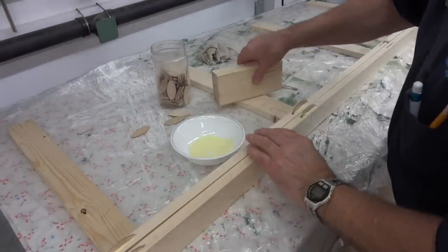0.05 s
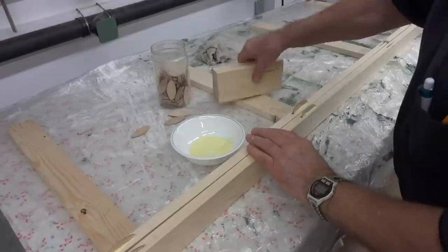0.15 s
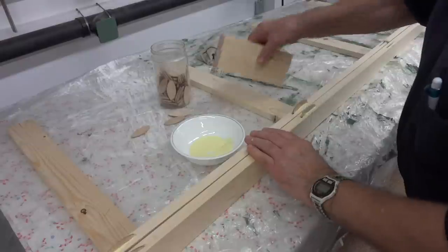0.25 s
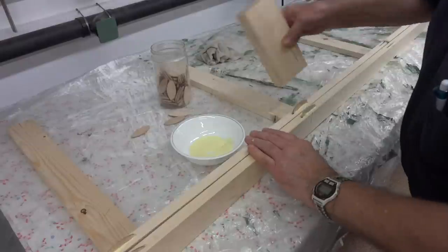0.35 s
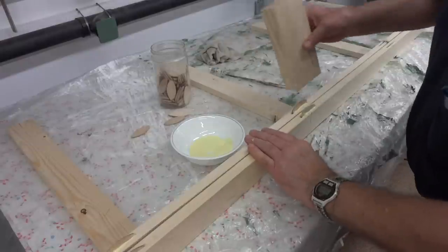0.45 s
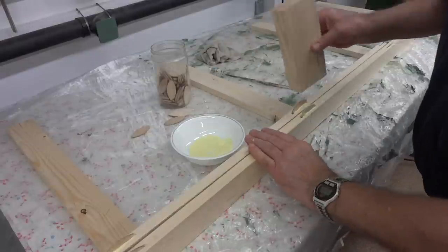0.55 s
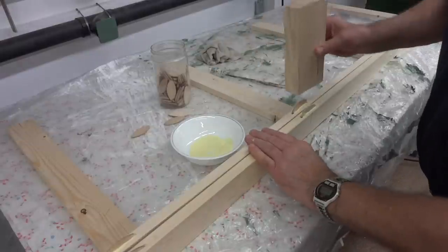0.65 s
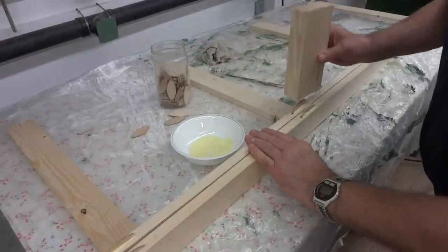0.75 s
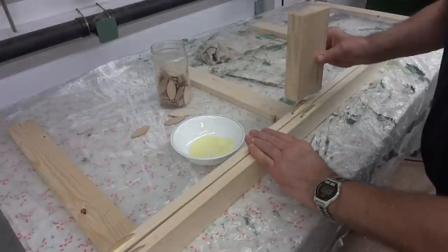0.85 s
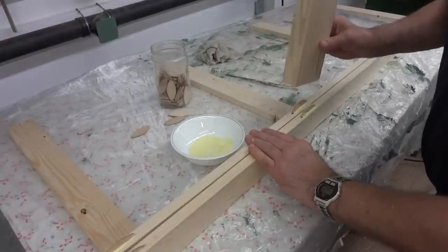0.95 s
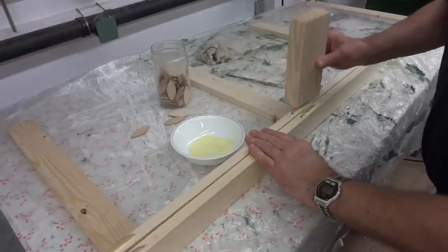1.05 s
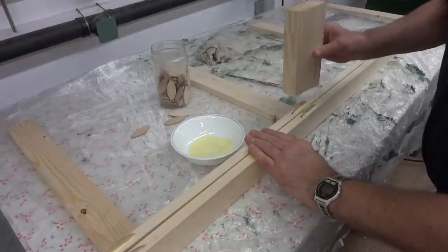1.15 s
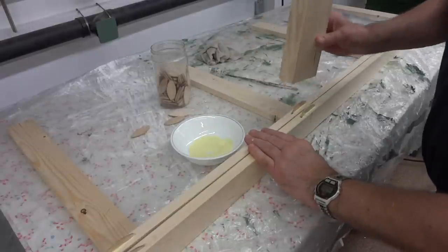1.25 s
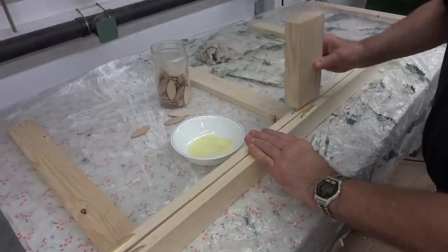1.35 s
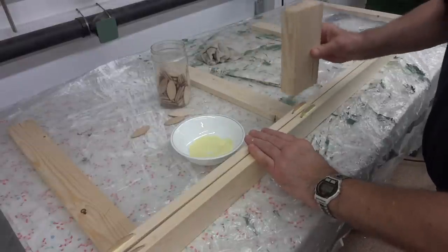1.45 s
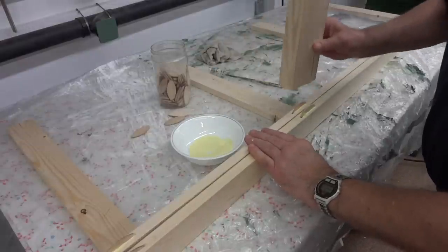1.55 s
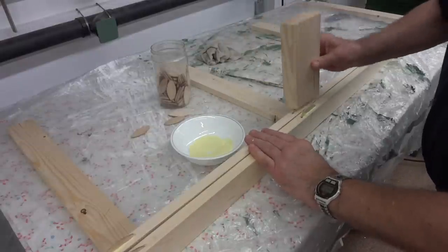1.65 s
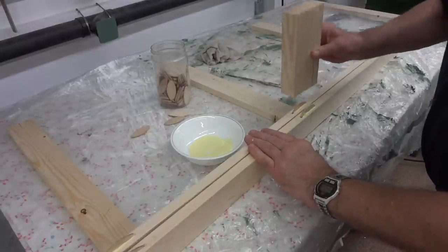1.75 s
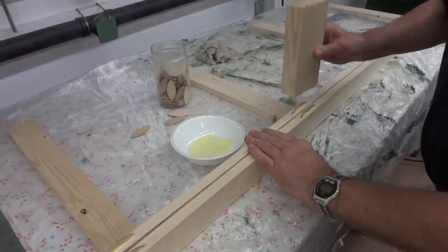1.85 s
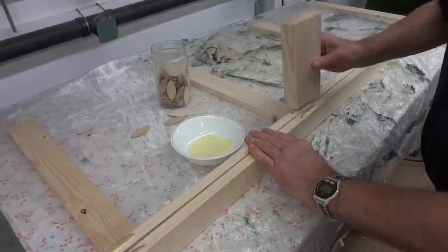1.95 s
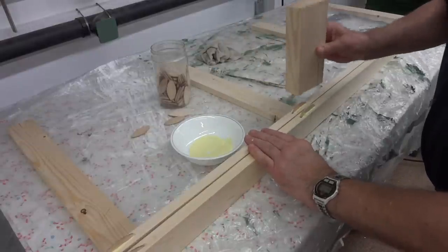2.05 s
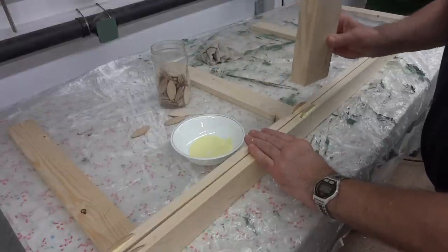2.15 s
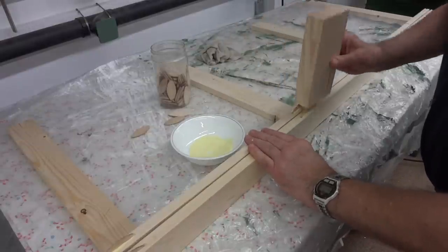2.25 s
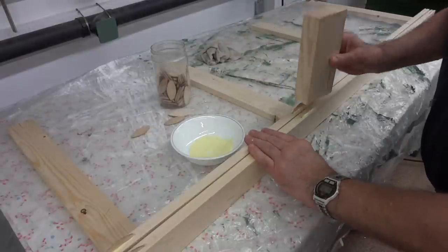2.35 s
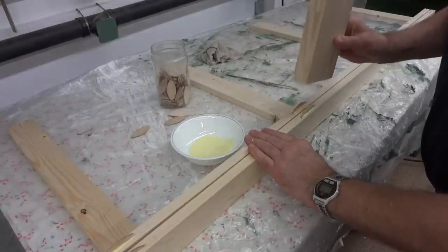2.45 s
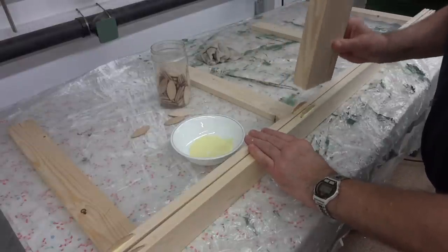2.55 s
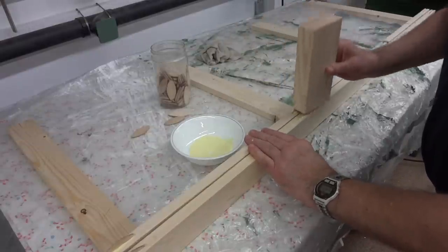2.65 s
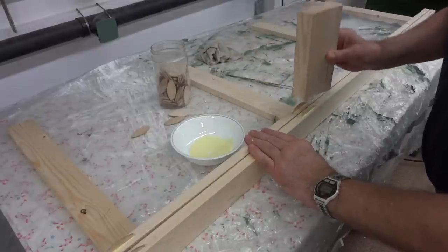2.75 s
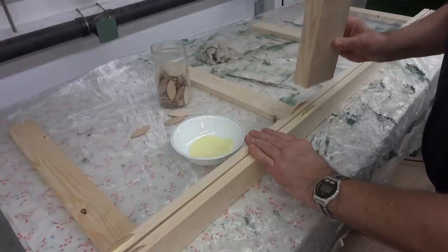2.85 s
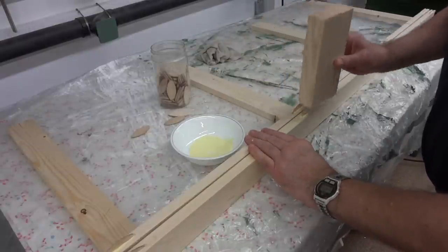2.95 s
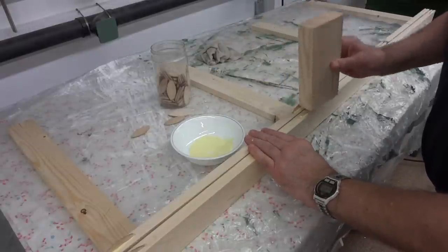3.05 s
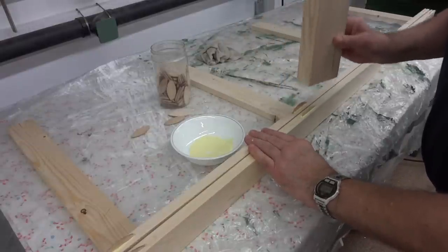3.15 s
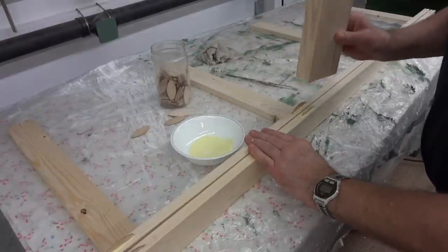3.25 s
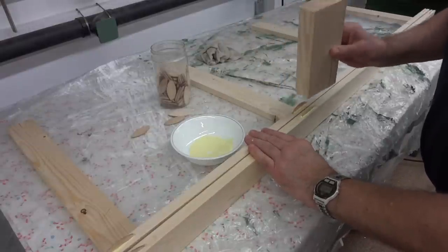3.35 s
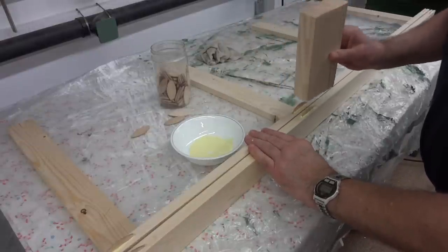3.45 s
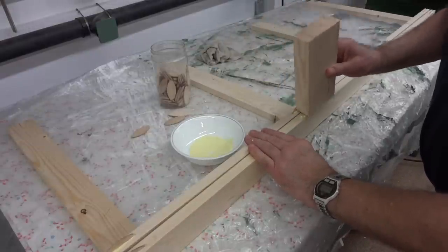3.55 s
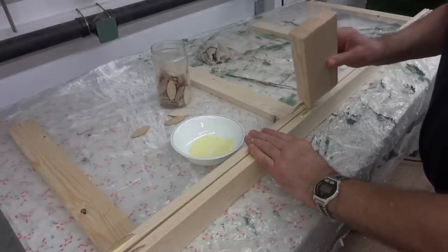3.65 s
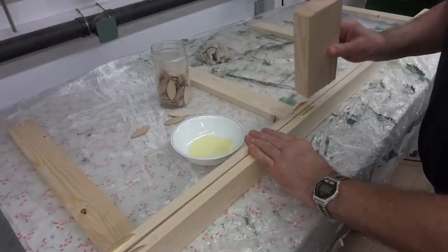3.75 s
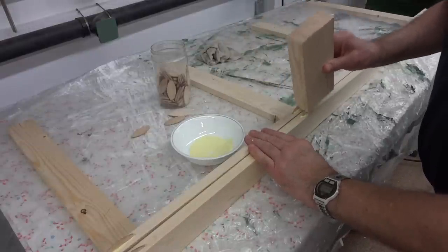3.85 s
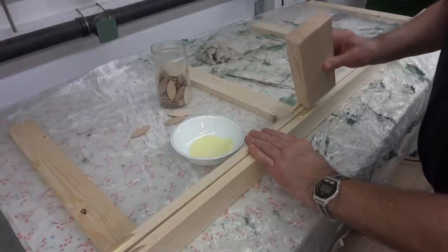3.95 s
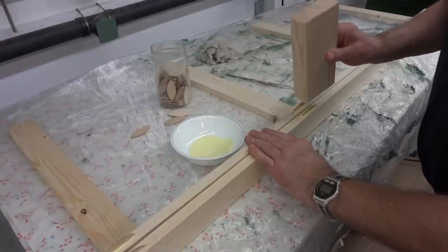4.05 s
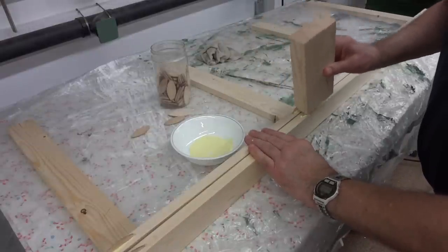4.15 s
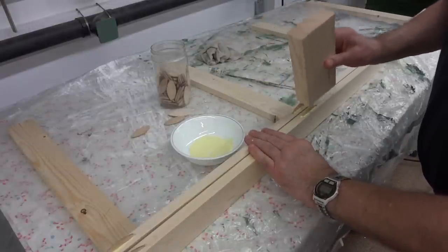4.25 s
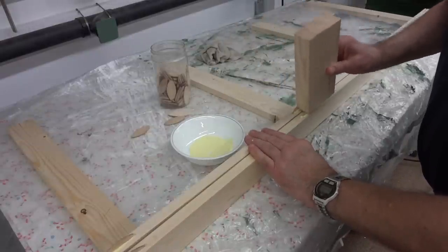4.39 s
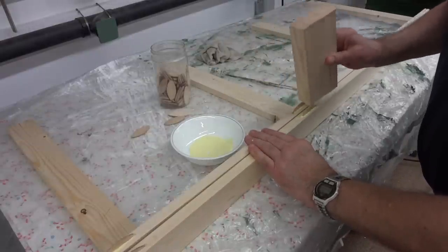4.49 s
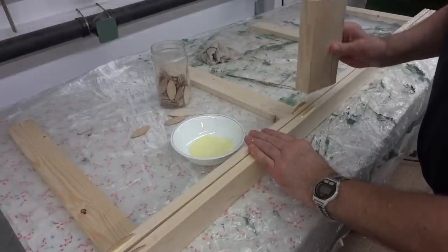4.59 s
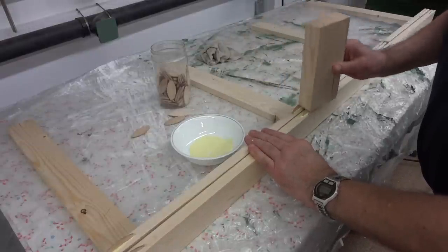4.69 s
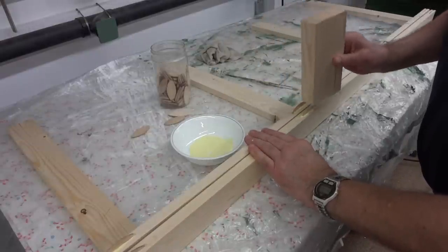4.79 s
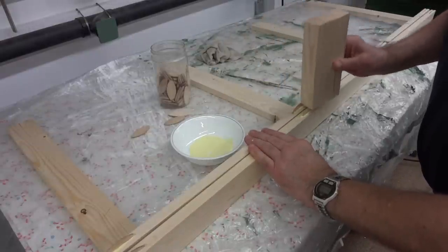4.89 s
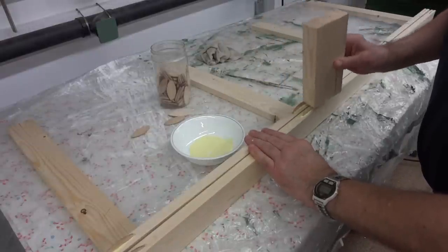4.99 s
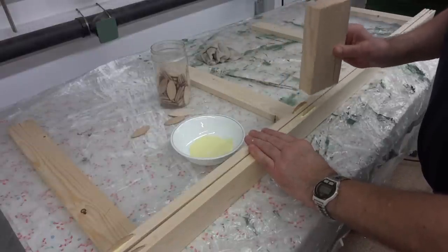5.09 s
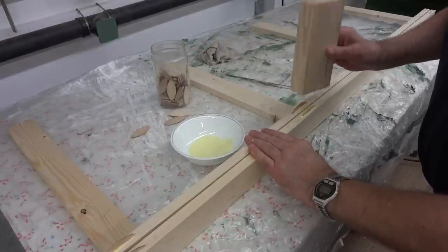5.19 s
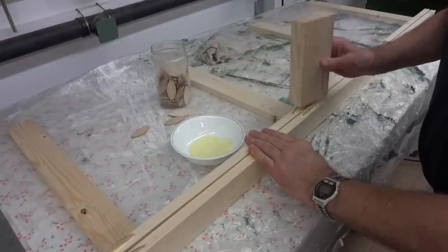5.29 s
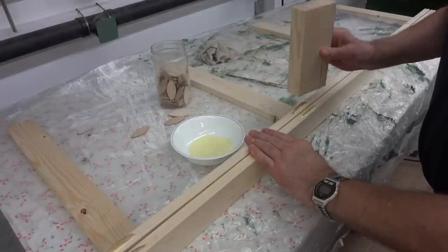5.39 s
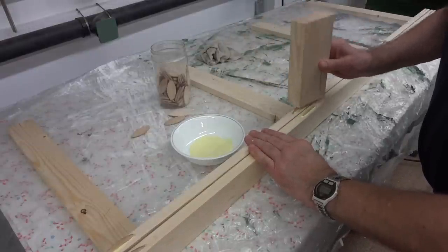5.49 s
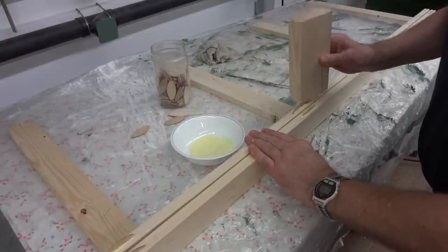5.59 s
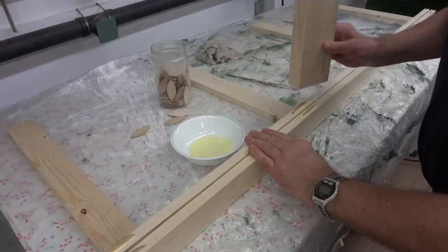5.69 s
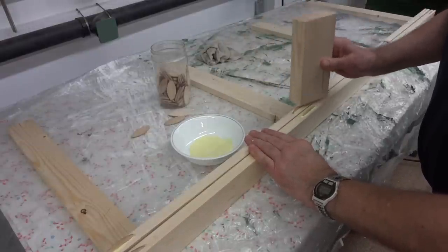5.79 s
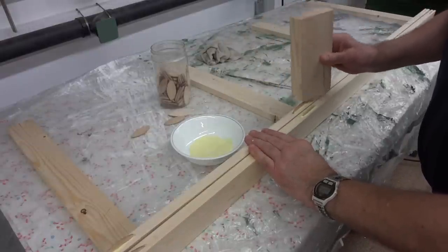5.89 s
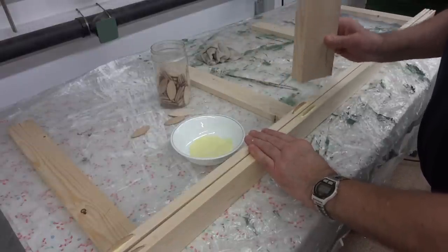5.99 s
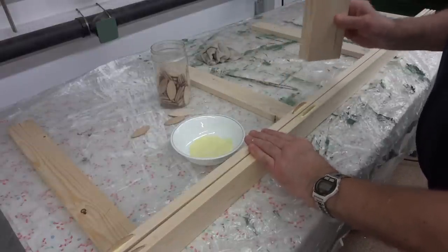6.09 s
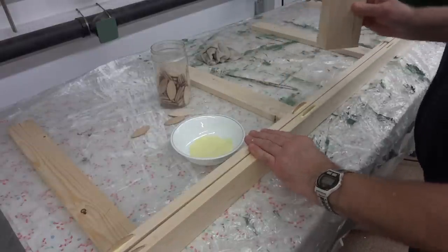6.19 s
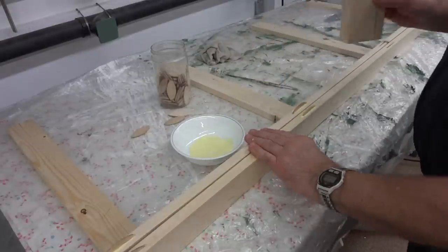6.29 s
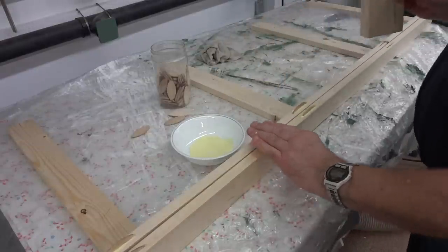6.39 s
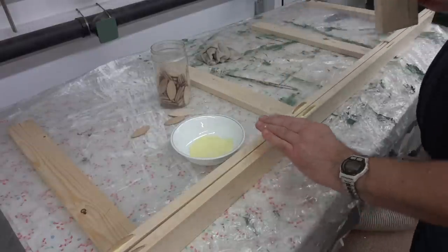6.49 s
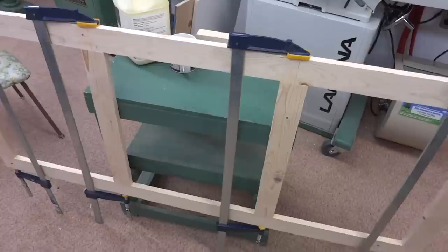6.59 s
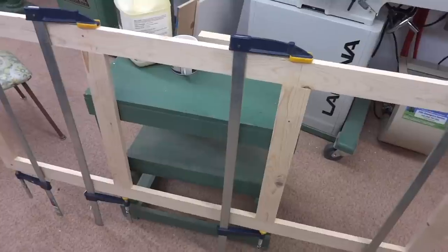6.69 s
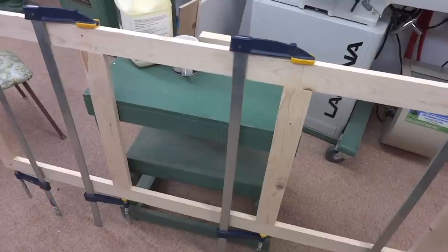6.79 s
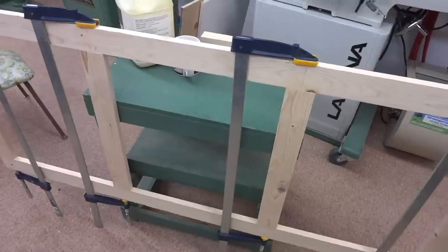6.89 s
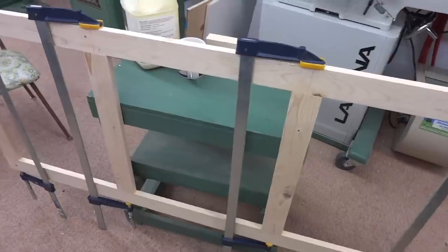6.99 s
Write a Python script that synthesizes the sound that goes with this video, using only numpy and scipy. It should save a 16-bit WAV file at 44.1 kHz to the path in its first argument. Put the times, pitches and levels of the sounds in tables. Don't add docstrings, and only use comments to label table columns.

```python
import sys
import numpy as np
from scipy import signal
from scipy.fft import rfft, irfft, next_fast_len
from scipy.io import wavfile
from scipy.ndimage import uniform_filter1d

SR = 44100
rng = np.random.default_rng(int(sys.argv[2]) if len(sys.argv) > 2 else 0)


def transcribe(signal):
    frames = np.atleast_2d(signal).T
    limited = np.clip(frames, -1, 1)
    pcm = np.round(limited * 32767).astype(np.int16)
    wavfile.write(sys.argv[1], SR, pcm)


def natural_amplitude(level_db):
    exponent = np.asarray(level_db, float) / 20
    return 10 ** exponent


N = 310093
HZ = abs(np.fft.fftfreq(16384, 1 / SR))


def evened(x):
    return x / np.sqrt(np.mean(x ** 2) + 1e-20)


def read(points, hz):
    f, value = np.transpose(points)
    return np.interp(np.log(hz + 1), np.log(f + 1), value)


def coloured(x, points):
    size = next_fast_len(x.shape[-1])
    gain = natural_amplitude(read(points, np.fft.rfftfreq(size, 1 / SR)))
    return irfft(rfft(x, size) * gain, size)[..., :x.shape[-1]]


def add(mix, s, sound):
    part = mix[..., round(s * SR):][..., :sound.shape[-1]]
    part += sound[..., :part.shape[-1]]


def peaks(modes, spread_db, detune=0.):
    hz, db, t60 = np.transpose(modes)[:, :, None]
    luck = rng.standard_normal((2, len(modes), 1))
    off = (HZ - hz * (1 + detune * luck[1])) * t60 / 1.54
    strength = t60 * natural_amplitude(db + spread_db * luck[0]) ** 2
    power = (strength / (1 + off ** 2) ** 1.77).sum(0)
    return power / power.mean()


def broad(points):
    power = natural_amplitude(read(points, HZ)) ** 2
    return power / power.mean()


def causal(power):
    log_size = .5 * np.log(power + 1e-14)
    return np.fft.ifft(np.exp(np.conj(signal.hilbert(log_size)))).real[:len(HZ) // 2]


# pitch in Hz, level in dB.
HUM_COLOUR = [(25, -6), (90, -6), (235, -12), (295, -1), (740, -3.5), (1500, -10), (4200, -16),
              (11000, -19)]
# pitch in Hz, width in Hz, level in dB.
HUM_PITCHES = [(262, 12, -79), (320, 11, -73), (372, 12, -71.5), (446, 8, -67), (546, 20, -72),
               (727, 30, -72), (2153, 520, -72)]
# pitch in Hz, level in dB.
MAINS_TONES = [(59.2, -72), (118.4, -81.5)]


def hum():
    size = next_fast_len(N)
    a, b = rng.standard_normal((2, size))
    hz = np.fft.rfftfreq(size, 1 / SR)
    shape = sum(natural_amplitude(db) * evened(1 / (1 + (2 * (hz - f) / w) ** 2)) for f, w, db in HUM_PITCHES)
    pitches = irfft(rfft(a) * shape, size)
    slow = uniform_filter1d(uniform_filter1d(rng.standard_normal(size), 4000), 4000)
    swell = natural_amplitude(0.79 * evened(slow))
    wash = coloured(np.array([b, natural_amplitude(-3.0) * b[::-1]]), HUM_COLOUR)
    wash = natural_amplitude(-59.5) * wash / wash[0].std()
    t = np.arange(size) / SR
    mains = sum(natural_amplitude(db) * np.sqrt(2) * np.sin(2 * np.pi * f * t) for f, db in MAINS_TONES)
    tones = np.array([[1], [.03]]) * (swell * pitches + mains)
    return (swell * wash + tones)[:, :N]


# loudest moment in seconds, level in dB,
# rise in seconds, fall in seconds, level of the dull part in dB.
STROKES = [
    (.1, -56, 0.0057, .1, -32),
    (.198, -60, 0.015, 0.017, -26),
    (.238, -54.5, 0.0085, 0.041, -22),
    (.43, -65, 0.037, 0.06, -5),
    (0.484, -42.5, 0.041, 0.021, -40),
    (.58, -50, 0.034, .05, -13),
    (.625, -59.5, 0.057, 0.047, 6),
]


def rustle():
    s, db, rise, fall, dull_db = np.transpose(STROKES)[:, :, None]
    t = np.arange(N) / SR - s
    strokes = natural_amplitude(db - 10.5 * np.maximum(-t / rise, t / fall))
    fibres = rng.standard_normal(N) * (rng.random(N) < .08)
    bright = evened(coloured(fibres, [(1500, -28), (4000, 1), (7000, 4.5), (9000, 9.5), (11500, 2.0)]))
    dull = evened(coloured(fibres, [(500, -6.0), (1200, 3.0), (2200, 1.5), (5000, -9.5), (9000, -27)]))
    return strokes.sum(0) * bright + (strokes * natural_amplitude(dull_db)).sum(0) * dull


# start in seconds, level in dB.
BRUSH_TIMES = [(0.188, -46), (0.2345, -42), (0.4634, -40), (0.499, -59)]
# pitch in Hz, level in dB, time to die by 60 dB in seconds.
BRUSH_TONES = [(2480, 14, 0.048), (3280, -3, 0.029), (4400, 1, 0.022), (5450, -4, 0.015)]


def brushes(out):
    for s, db in BRUSH_TIMES:
        add(out, s, natural_amplitude(db + 21) * causal(peaks(BRUSH_TONES, spread_db=6.0)))


# pitch in Hz, time to die by 60 dB in seconds.
ECHO_LENGTH = [(100, 0.8), (270, 0.4), (700, 0.34), (1800, 0.23), (4800, 0.24), (10000, 0.2)]
# pitch in Hz, left-right difference against the middle in dB.
ECHO_WIDTH = [(60, -36.5), (140, -21), (350, -26), (830, -15), (2000, -13), (4800, -10), (11500, -27.5)]
# delay in seconds, level in dB.
SINGLE_ECHOES = [(0, -20), (.0036, -14), (.0064, -18.5), (.012, -25)]


def room():
    taps = rng.standard_normal((2, SR))
    taps[1] = coloured(taps[1], ECHO_WIDTH)
    hz, t, z = signal.stft(taps, SR, nperseg=256)
    hz = hz[:, None]
    near_wall = 1 + 0.7 * np.exp(-t / 0.005) * np.clip(hz / 6000., 0, 1)
    bloom = 1 - 0.28 * np.exp(-t / .012) / (1 + (hz / 1400.) ** 2)
    far_wall = 1 + 0.22 * np.exp(-((t - 0.053) / 0.014) ** 2)
    fill_s = 0.033
    decay = natural_amplitude(-60 * (np.hypot(t, fill_s) - fill_s) / read(ECHO_LENGTH, hz))
    tail = signal.istft(z * near_wall * far_wall * bloom * decay, SR, nperseg=256)[1][:, :SR]
    tail *= np.clip(np.arange(SR) / SR / .0012, 0, 1)
    tail /= np.linalg.norm(tail[0])
    for s, db in SINGLE_ECHOES:
        tail[0, round(s * SR * rng.uniform(.97, 1.03))] += natural_amplitude(db)
    return tail


# pitch in Hz, level in dB, time to die by 60 dB in seconds.
CLOCK_CASES = [
    [(5150, -2, .008), (5570, 0, .011), (6000, -4, .006), (6400, -2, .007), (7000, -4, .006)],
    [(2970, 0, .015), (3290, -2, .015), (4800, -14, .008)],
]


def clocks(out):
    even = np.arange(.330, N / SR, .4415)
    limping = np.arange(.262, N / SR, .4793)
    limping = limping - .003 * (np.arange(len(limping)) % 2)
    for times, db, case in zip([even, limping], [-24.5, -28.5], CLOCK_CASES):
        for s in times:
            add(out, s, natural_amplitude(db) * causal(peaks(case, spread_db=5.5, detune=0.0092)))


# pitch in Hz, level in dB, time to die by 60 dB in seconds.
TIP_TONES = [(1080, -12, .03), (2350, -9, .025), (3220, -4, .008), (3950, 0, .005), (4760, -9, .006)]
CORNER_TONES = [(1090, -10, 0.027), (1487, -1.5, 0.014), (2317, -1.5, 0.025), (2586, -6, 0.016),
                (2970, -3, 0.0087), (3400, -1, 0.01), (3670, -3, 0.011), (4000, -8.5, 0.01)]
FLAT_TONES = [(1150, -3, 0.04), (1542, 1.5, 0.03), (2378, 4, 0.041), (2450, -8.5, .025), (2757, 0, 0.022),
              (3300, -21, 0.014), (3603, -9.5, 0.046), (4070, -10, .02), (4690, -24.5, 0.012)]


def struck_face(k):
    if k == 0:
        return TIP_TONES
    return CORNER_TONES if k < 3 else FLAT_TONES


# pitch in Hz, level in dB, time to die by 60 dB in seconds.
FRAME_TONES = [(823, 6, 0.1), (1104, -7.5, 0.013), (1104.4, 3, 0.032), (1298, -2.5, 0.065),
               (1470, -12, 0.019), (1492, -6.5, 0.043), (1850, -8.5, 0.026)]
BENCH_TONES = [(276.8, -9, 0.058), (326, 2, 0.17), (343, 15, 0.02), (432, 3, 0.039), (429.6, 5.5, 0.028),
               (546, 4, 0.49), (638.5, -3.5, 0.14)]
# pitch in Hz, level in dB.
THUD_COLOUR = [(50, -46.5), (120, -20.5), (232, -23), (272, -9), (600, 0), (850, -3.5), (1300, -8),
               (3000, -41)]
KNOCK_COLOUR = [(200, -34), (500, -9.5), (800, 2.5), (1900, 4.5), (2900, -14), (6000, -55.5)]
TOCK_COLOUR = [(30, -62.5), (110, -30), (500, -38), (1500, -11.5), (2200, 4), (4300, -2), (6000, -8.5),
               (11000, -27.5)]
CRACK_COLOUR = [(800, -45), (3000, -11), (5000, -2), (7000, 7), (9500, 1), (12500, 3.5)]
# seconds after the blow, level in dB.
SLAP_BACKS = [(.028, -7.5), (.05, -6.5), (.078, -14.5)]


def blow(face, block_db, bench_db, crack_db, free):
    jump = np.clip((bench_db + 22.5) / 10., 0, 1)
    frame_db = bench_db + 12.5 + 0.53 * block_db
    block = free * peaks(face, spread_db=0.36) + (1 - free) * 0.52 * broad(TOCK_COLOUR)
    frame = 0.16 * peaks(FRAME_TONES, spread_db=3.5) + 0.42 * broad(KNOCK_COLOUR)
    no_deep_bass = 1 / (1 + (232.0 / (HZ + 1)) ** 8)
    bench = .4 * peaks(BENCH_TONES, spread_db=3.5) * no_deep_bass + 0.87 * broad(THUD_COLOUR)
    body = natural_amplitude(frame_db + 33.5) ** 2 * frame + natural_amplitude(bench_db + 36.5) ** 2 * bench
    top = natural_amplitude(block_db + 28.5) ** 2 * block + natural_amplitude(crack_db + 29.0) ** 2 * broad(CRACK_COLOUR)
    out = causal(body + top)
    slap = causal(body + 0.22 * top)
    for s, db in SLAP_BACKS:
        add(out, s * rng.uniform(0.97, 1.04), jump * natural_amplitude(db) * slap)
    return out


def ring(hz, t60, rise):
    t = np.arange(SR // 2) / SR
    return natural_amplitude(-60 * t / t60) * (1 - np.exp(-t / rise)) * np.sin(2 * np.pi * hz * t)


# pitch in Hz, level in dB, time to die by 60 dB in seconds.
LEG_TONES = [(66, -47, .3), (92.6, -44, 0.54), (121.4, -41, 0.39)]


def slab(bench_db):
    luck = rng.standard_normal((len(LEG_TONES), 2))
    legs = sum(natural_amplitude(db + 4.0 * a) * ring(hz * (1 + 0.13 * b), t60, rise=0.018)
               for (hz, db, t60), (a, b) in zip(LEG_TONES, luck))
    top_db = bench_db - 3.5 + 0.48 * min(bench_db + 24.5, 0)
    top = natural_amplitude(top_db) * ring(271 * rng.uniform(.99, 1.01), t60=0.62, rise=.012)
    return top + natural_amplitude(0.5 * (bench_db + 18.5)) * legs


# start in seconds, level in dB, level of the dull part in dB.
GRAZE_TIMES = [
    (2.0, -24., -22.5),
    (2.006, -22, 9.5),
]


def grazes(out):
    for s, db, dull_db in GRAZE_TIMES:
        power = broad(CRACK_COLOUR) + natural_amplitude(dull_db) ** 2 * broad(KNOCK_COLOUR)
        add(out, s, natural_amplitude(db) * causal(power))


# start in seconds, block level in dB, bench thud level in dB,
# contact crack level in dB, how freely the wood rings from 0 to 1.
BLOW_TIMES = [(0.9072, -19.5, -38.5, -21.5, 0.4), (1.17, -14, -34.5, -31, 0.7),
              (1.4503, -15.5, -25.5, -28.5, 0), (1.7305, -19, -15.5, -23, 0.1),
              (2.0126, -17.5, -15.5, -25, 0.8), (2.388, -12.5, -37.5, -25, 0.4),
              (2.7542, -13, -35.5, -24, 0.4), (3.0942, -13.5, -26.5, -19.5, 0.6),
              (3.6517, -10, -25.5, -16.5, 0.6), (3.9802, -13, -21, -20.5, 0.7),
              (4.249, -10.5, -18.5, -26, 0.8), (4.4782, -15, -17.5, -22.5, 0.9),
              (4.7786, -23, -16, -28, 0.07), (5.013, -19.5, -17.5, -29, 0.3),
              (5.3444, -11.5, -14, -32, 0.6), (5.5962, -13.5, -13.5, -29.5, 0.8),
              (5.8993, -13.5, -14, -27.5, 0.5)]


def scene():
    mix = hum()
    cloth = rustle()
    shared = room()
    others = [room() for _ in range(4)]
    small = np.zeros(N)
    brushes(small)
    clocks(small)
    grazes(small)
    mix += signal.fftconvolve(small[None], others[0], axes=1)[:, :N]
    mix += np.array([[1], [.04]]) * cloth
    travel_s = .0012
    for k, (s, block_db, bench_db, crack_db, free) in enumerate(BLOW_TIMES):
        struck = blow(struck_face(k), block_db, bench_db, crack_db, free)
        answer = 0.69 * shared + 0.52 * others[k % 4]
        add(mix, s + travel_s, signal.fftconvolve(struck[None], answer, axes=1))
        add(mix[0], s, slab(bench_db))
    left_right = np.array([mix[0] + mix[1], mix[0] - mix[1]])
    return left_right * natural_amplitude(np.array([[.2], [-.2]]))


def low_pass(x):
    return signal.sosfilt(signal.butter(12, 12130, fs=SR, output="sos"), x)


# time in seconds, gain.
FADE_OUT = [(6.0, 1.0), (6.3, 0.75), (6.5, 0.23), (6.559, 0.005)]


def record(dry):
    edge = signal.firwin(1023, 11050, window=("kaiser", 8), fs=SR)
    dry = signal.oaconvolve(dry, edge[None], "same")
    power = uniform_filter1d((dry ** 2).mean(0), 260, origin=-100)
    power_db = 10 * np.log10(abs(power) + 1e-12)
    fall = np.arange(N) * 960.0 / SR
    held_db = np.maximum.accumulate(power_db + fall) - fall
    over_db = np.maximum(held_db + 13.0, 0)
    turned_down = dry / natural_amplitude(0.42 * uniform_filter1d(over_db, 220))
    held = 1.294 * np.tanh(turned_down / 1.204)
    upper = signal.butter(2, 110, "high", fs=SR, output="sos")
    held = dry + signal.sosfiltfilt(upper, held - dry)
    fade = np.interp(np.arange(N) / SR, *np.transpose(FADE_OUT))
    return low_pass(held * np.clip(fade, 0, 1))


dry = scene()
out = record(dry)
transcribe(out)
```